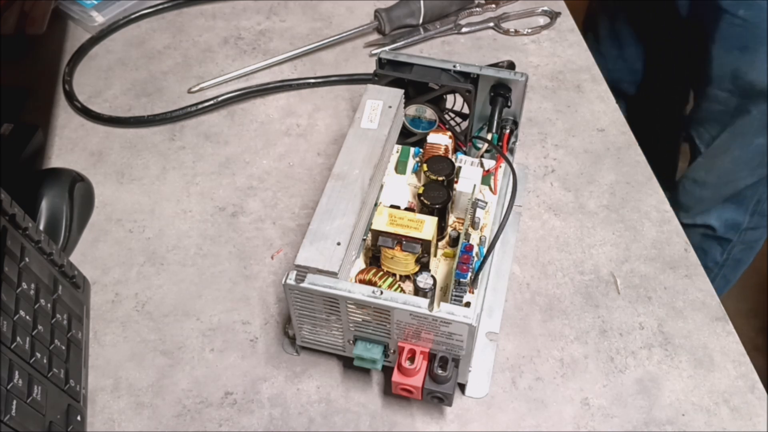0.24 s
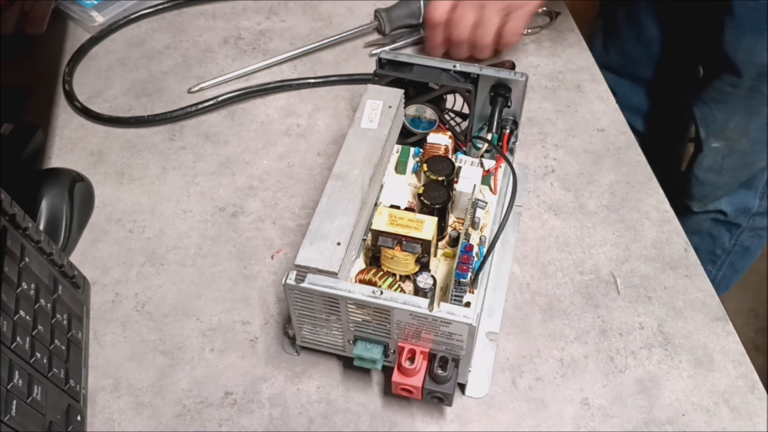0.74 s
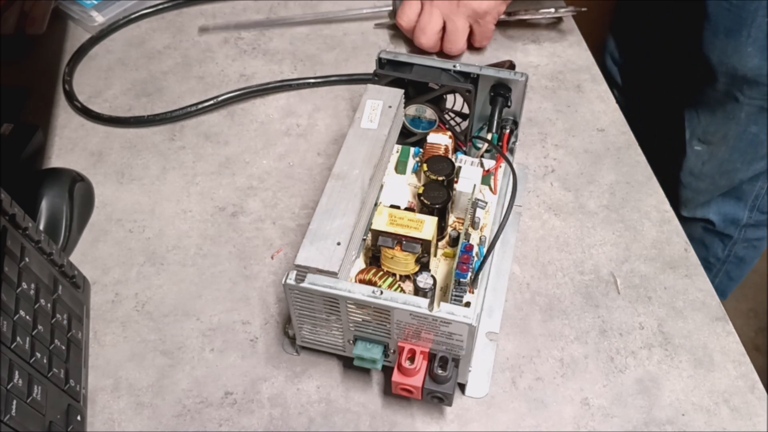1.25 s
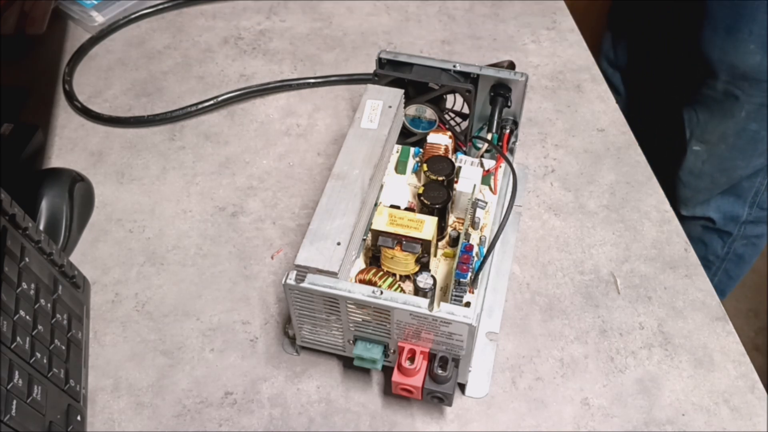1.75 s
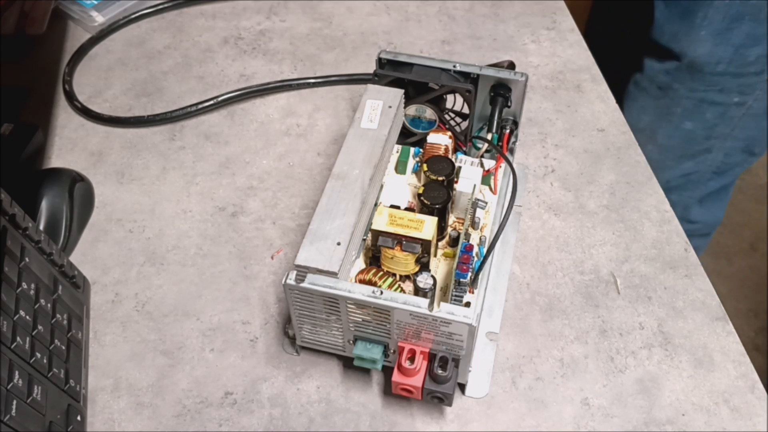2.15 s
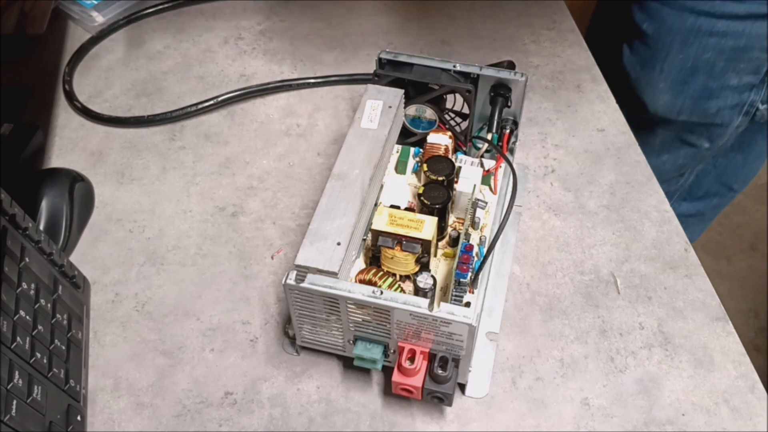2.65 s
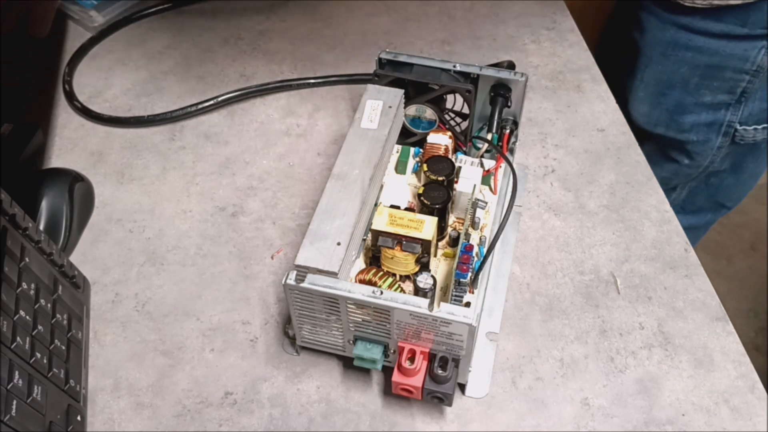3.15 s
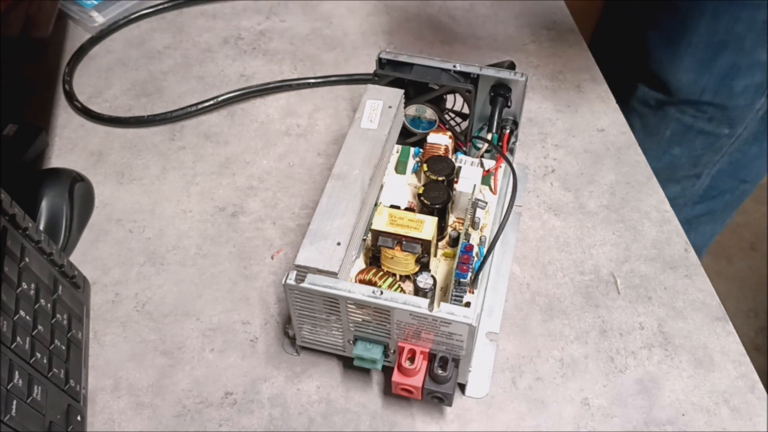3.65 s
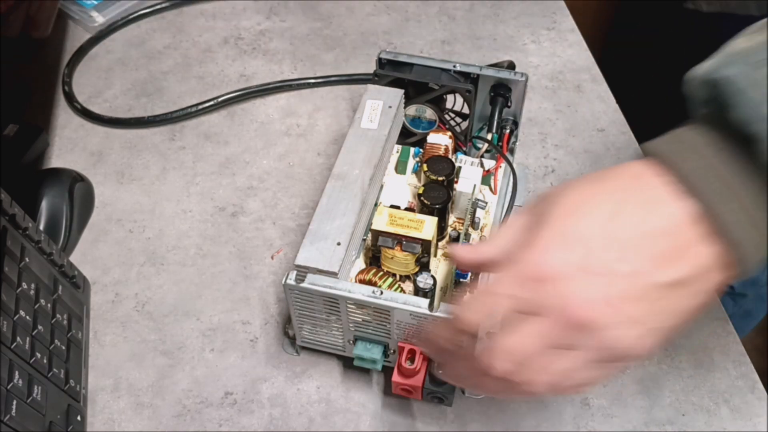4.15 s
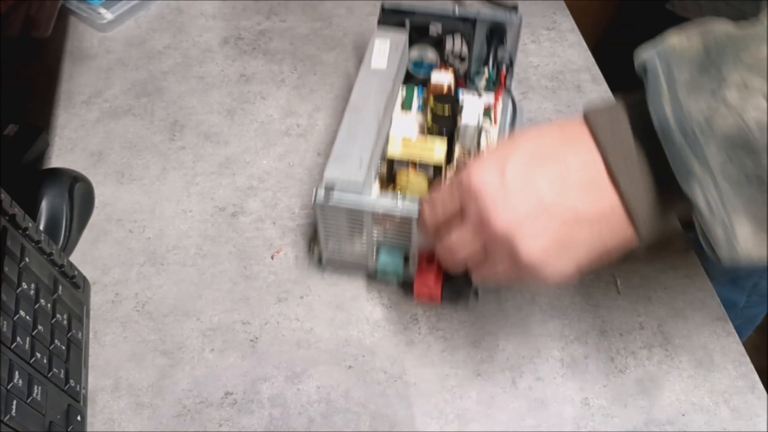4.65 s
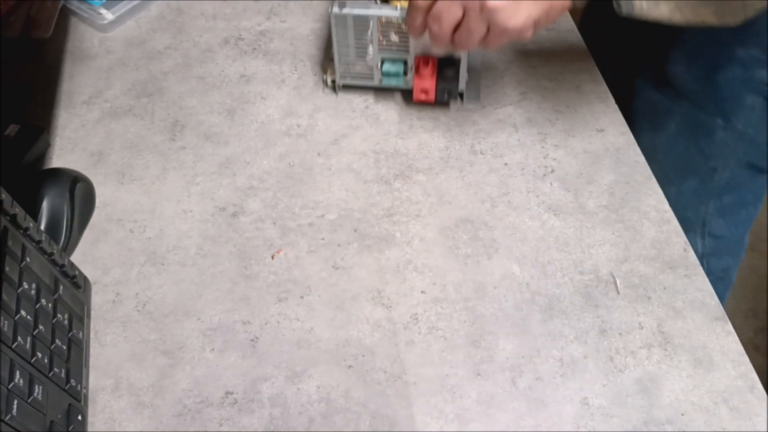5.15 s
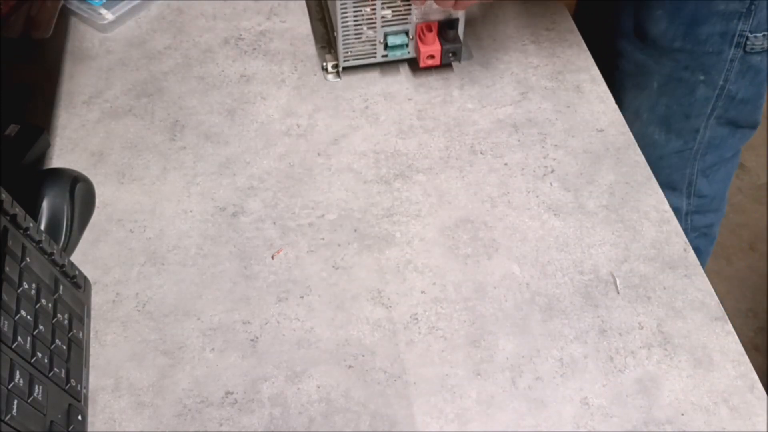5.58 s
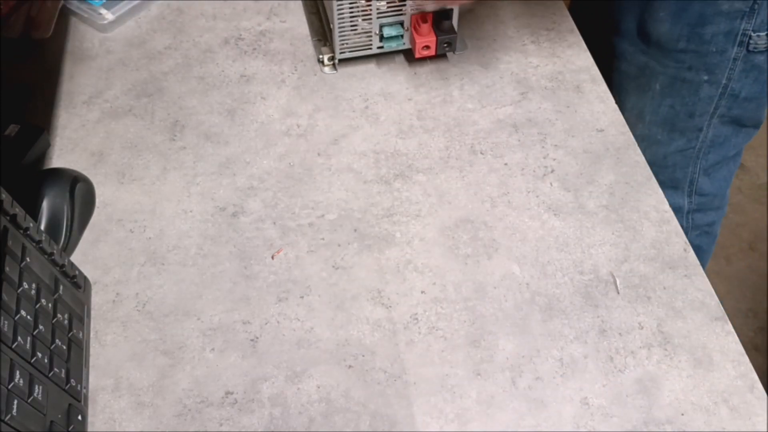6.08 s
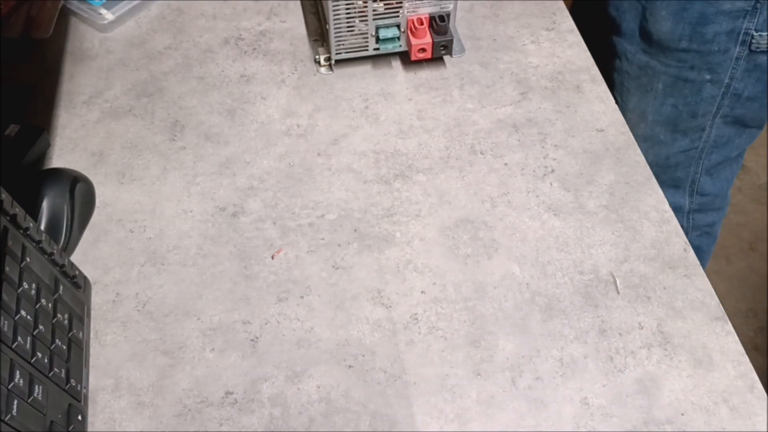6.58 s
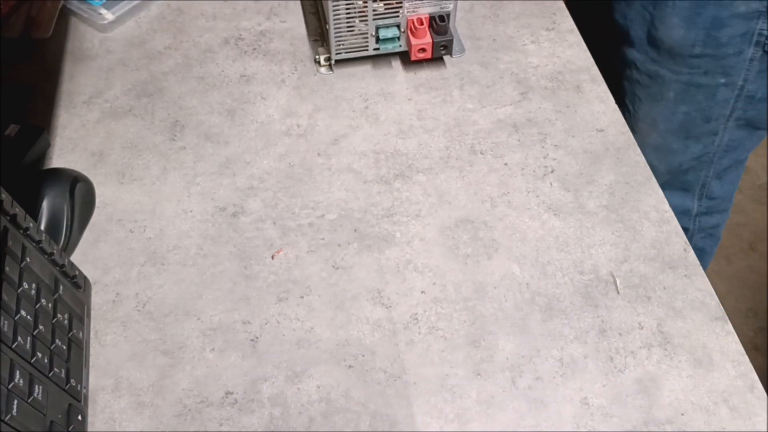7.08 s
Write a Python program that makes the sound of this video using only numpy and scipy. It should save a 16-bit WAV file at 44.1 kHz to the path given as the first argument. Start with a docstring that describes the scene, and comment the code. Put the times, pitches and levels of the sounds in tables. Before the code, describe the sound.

Steel hand tools are gathered off a countertop with jingles, then clatter down onto a shelf; a sheet-metal case scrapes briefly across the counter.

```python
"""A quiet room's hush and faint rustle come first; then steel hand tools are gathered off a countertop,
jingle in the hand and are dropped on a shelf. A sheet-metal case scrapes across the counter; small parts tick.
Blows are contact noise and damped modes, knocks a sine boom and a clack, rubbing shaped trains of tiny catches.
Two unlike microphone ports hear it: a bright right one and a duller left one a millisecond later."""
import sys
import numpy as np
from scipy import signal
from scipy.fft import rfft, irfft, next_fast_len
from scipy.io import wavfile
from scipy.ndimage import uniform_filter1d

SR = 44100
rng = np.random.default_rng(int(sys.argv[2]) if len(sys.argv) > 2 else 0)


def wav_out(sig):
    """Save sig, one row per channel (or a flat mono array), as 16-bit PCM at SR to the path in sys.argv[1]."""
    wavfile.write(sys.argv[1], SR, np.round(np.clip(np.atleast_2d(sig).T, -1, 1) * 32767).astype(np.int16))


def voltage_ratio(decibels):
    """Convert decibels (scalar or array-like) to amplitude ratios, 20 dB per decade."""
    exponent = np.asarray(decibels, float) / 20
    return 10 ** exponent


N = 322900
# Centres of the short-time analysis bins and frames
FRAME_HZ = np.fft.rfftfreq(1024, 1 / SR)
FRAME_S = np.arange(N // 256 + 2) * 256 / SR

# All levels are relative; spectra give only a shape.
# Room hush spectrum: (pitch_hz [Hz], level_db [dB])
AIR_SPECTRUM = [(15, -51), (25, -10.5), (80, -8), (117, -2.5), (134, -15.5), (162, -9.5), (196, -20),
                (287, -16), (338, -19.5), (581, -20.5), (630, -26), (782, -24.5), (4940, -38), (10000, -37),
                (16300, -46)]
# Reverberation of the room: (pitch_hz [Hz], t60_s [s])
ROOM_DECAY = [(100, 0.04), (500, 0.25), (2000, 0.31), (6000, 0.28), (12000, 0.2)]
# Left-right likeness: (pitch_hz [Hz], likeness [0-1])
LIKENESS = [(100, .95), (500, .8), (900, .35), (2000, .15), (8000, .1)]
# Left port's response over the right one's: (pitch_hz [Hz], level_db [dB])
PORT_DIFFERENCE = [(60, 4), (300, 6), (1300, 5.5), (3000, 1), (7500, -5), (9000, -14), (11000, -33),
                   (15000, -36)]
# Sleeves and hands brushing: (top_s [s], fade_s [s], skin_db [dB], cloth_over_skin_db [dB])
BRUSH_STROKES = [(0.27, 0.2, -78.5, 3.5), (0.41, 0.039, -75, 3), (2.145, 0.035, -64.5, 7.5),
                 (2.222, 0.097, -40, -12.5), (3.69, 0.18, -75.5, -83), (3.762, 0.089, -49.5, 3),
                 (4.027, 0.036, -45, -6.5), (4.12, 0.13, -63.5, 3.5), (5.8, 0.081, -58.5, -34),
                 (6.092, 0.11, -66, -2), (6.3, .15, -76.5, 1.5), (6.679, .15, -80, -4),
                 (6.951, 0.14, -61.5, -20.5), (7.128, 0.028, -58.5, -16), (7.218, 0.068, -54.5, -18),
                 (7.32, 0.04, -44.5, 12)]
# Spectrum of cloth hiss: (pitch_hz [Hz], level_db [dB])
CLOTH_SPECTRUM = [(880, -10), (1500, -1.5), (1780, -3.5), (8320, -13), (9560, -6.5), (12900, -19.5),
                  (14600, -27), (16000, -43)]
# Spectrum of skin rustle: (pitch_hz [Hz], level_db [dB])
SKIN_SPECTRUM = [(120, -40), (200, -8), (232, -62), (379, 9), (538, 13.5), (727, -9), (1770, -4),
                 (4000, -21), (5200, -26), (8800, -120)]
# Weight shifting on counter and floor: (top_s [s], fade_s [s], level_db [dB])
WEIGHT_THUMPS = [(0.37, 0.13, -64), (0.51, 0.18, -54.5), (0.7, 0.044, -45.5), (0.9, 0.22, -49.5),
                 (1.1, 0.22, -50), (1.45, 0.13, -71), (2.202, 0.12, -37.5), (2.359, 0.042, -53),
                 (2.84, 0.17, -61.5), (3.205, .12, -25), (3.42, 0.15, -30.5), (3.55, .1, -40),
                 (3.74, 0.079, -54.5), (4.032, 0.11, -50.5), (5.801, .1, -59), (6.05, .08, -62),
                 (6.92, 0.11, -69.5), (7.128, 0.049, -57), (7.218, .05, -60), (7.32, 0.097, -47.5)]
# Spectrum of the thumps: (pitch_hz [Hz], level_db [dB])
THUMP_SPECTRUM = [(15, -47.5), (25, -44.5), (118, 9.5), (151, -4), (209, -5), (249, -7), (382, -13.5),
                  (400, -9.5), (520, -46), (880, -120)]
# Tools dragged over the board: (top_s [s], fade_s [s], rattle_db [dB], hiss_over_rattle_db [dB])
TOOL_DRAGS = [(0.51, 0.11, -52.5, -10.5), (0.653, .07, -38.5, 2.5), (0.761, 0.093, -43, -24),
              (0.802, 0.034, -22.5, -14.5), (0.889, 0.12, -33.5, -24), (0.96, 0.15, -49, 3),
              (1.094, 0.081, -28.5, -12), (1.182, 0.046, -34, -7.5), (1.248, 0.049, -36.5, -1),
              (1.36, 0.1, -61.5, -25), (2.41, 0.21, -77.5, 20), (2.545, 0.11, -78.5, 27.5),
              (2.68, .15, -84, 16), (2.952, 0.091, -45.5, -0.5), (3.06, .07, -37, 6.5),
              (3.202, 0.054, -24, -3.5), (3.29, 0.2, -30.5, -6), (3.398, .1, -33.5, -2.5),
              (3.562, 0.11, -40.5, -5.5)]
# Spectrum of dragged steel: (pitch_hz [Hz], level_db [dB])
HISS_SPECTRUM = [(880, -57.5), (1500, 1.5), (2690, -7), (3000, -0.5), (3810, -15.5), (4160, -10),
                 (7840, -14.5), (10500, -23), (16000, -35)]
# Spectrum of the rattling board: (pitch_hz [Hz], level_db [dB])
RATTLE_SPECTRUM = [(120, -34.5), (200, -10.5), (518, -3), (573, -9.5), (794, -10), (856, -22), (1010, -6),
                   (4000, -28), (5200, -40.5), (8800, -120)]
# The case sliding: (time_s [s], level_db [dB], speed [0-1, raises the grit])
SLIDE_MOTION = [(4.175, -66, 0.5), (4.19, -51.5, 0.6), (4.294, -46, 0.4), (4.418, -35.5, 0.28),
                (4.5, -34, 0.32), (4.58, -36.5, 0.5), (4.65, -38, 0.58), (4.665, -33.5, 0.5),
                (4.75, -36.5, 0.69), (4.864, -34.5, 0.71), (4.92, -32.5, 0.48), (4.95, -34.5, 0.4),
                (5.038, -36, 0.39), (5.128, -42.5, 0.47), (5.202, -45.5, 0.33), (5.278, -51.5, 0.41),
                (5.33, -46.5, 0.86), (5.436, -39.5, 0.37), (5.635, -59, 0.33), (5.702, -61, 0),
                (5.722, -41.5, 0.64), (5.75, -70, 1), (5.8, -58, 0.5)]
# Panel resonances of the sliding case: (pitch_hz [Hz], width_hz [Hz, at least pitch / 40], level_db [dB])
CASE_PANELS = [(870, 150, -3), (1250, 130, 0), (2120, 80, -6), (2570, 200, -4), (3070, 150, -8),
               (3790, 120, -9), (4580, 140, -10), (7390, 200, -11), (9330, 250, -10), (10100, 450, -3),
               (11600, 300, -13)]
# Spectrum of the scrape: (pitch_hz [Hz], level_db [dB])
SCRAPE_SPECTRUM = [(150, -48), (250, -8), (798, 3.5), (1140, 0), (1300, 9), (1560, -4), (2570, -9),
                   (4000, -13), (5200, -10), (8800, -120)]
# Spectrum of the grit: (pitch_hz [Hz], level_db [dB])
GRIT_SPECTRUM = [(1180, -34), (2000, -5.5), (2600, -4), (3460, -6.5), (7570, -10), (9920, -7),
                 (13300, -14.5), (16000, -26.5)]
# Counter shuddering under a dropped or sliding weight: (top_s [s], fade_s [s], level_db [dB])
COUNTER_SHUDDERS = [(2.19, 0.078, -41), (3.02, 0.062, -46), (3.205, .08, -41.5), (3.5, 0.12, -54.5),
                    (4.26, 0.17, -58), (4.69, 0.12, -46), (4.83, 0.17, -48.5), (4.93, .08, -42),
                    (5.1, 0.075, -53.5), (5.27, 0.027, -57), (5.72, 0.082, -61.5)]
# Spectrum of the shudder: (pitch_hz [Hz], level_db [dB])
RUMBLE_SPECTRUM = [(15, -51.5), (25, 4.5), (59, 23.5), (129, 14.5), (182, 21), (300, -48), (390, -67),
                   (660, -120)]
# Board knocks, and the mid-pitched body of small ticks:
# (start_s [s], boom_db [dB], clack_over_boom_db [dB], boom_hz [Hz], clack_hz [Hz])
KNOCK_BLOWS = [(0.458, -60, 22, 116, 441), (0.503, -40.5, 8, 203, 756), (0.544, -31.5, 17.5, 164, 1240),
               (0.628, -40, 17.5, 180, 1470), (0.78, -27, 11.5, 172.6, 1760), (0.819, -35, 15.5, 178, 450),
               (0.885, -28.5, 11.5, 187, 1460), (1.015, -30.5, 19, 199, 1600), (1.049, -28, 11, 176, 1530),
               (1.072, -35.5, 9.5, 180, 525), (1.119, -45, 2, 188, 996), (1.226, -35, 15.5, 170, 1020),
               (1.775, -70, 29.5, 170, 1500), (1.845, -67.5, 32, 94.2, 1840),
               (1.973, -64.5, 24.5, 161, 689), (2.168, -33.5, 9, 166, 880), (2.205, -28.5, -0.5, 155, 540),
               (2.19, -23, 3, 153, 560), (2.717, -50, -2.5, 256, 1790), (2.902, -36.5, -12, 122, 1100),
               (2.994, -31, 23.5, 253, 1000), (3.032, -15.5, 1, 178, 1200), (3.068, -29.5, -3, 194, 1690),
               (3.123, -34, 14, 124, 869), (3.183, -20, 12.5, 134, 780), (3.207, -20.5, -8.5, 90, 721),
               (3.32, -25.5, 15.5, 117, 665), (3.382, -27, 13, 142, 525), (3.421, -37, -5.5, 135, 1640),
               (3.479, -26.5, 5, 203, 509), (3.716, -39.5, 10, 255, 527), (4.016, -46.5, 12, 140, 554),
               (4.181, -59, 27, 94.2, 565), (4.325, -59, 30, 133, 890), (5.707, -52, 9.5, 93, 816),
               (5.775, -61.5, 16.5, 80.7, 1410), (5.995, -61, 18.5, 94.2, 1330), (6.93, -67, 16, 120, 900),
               (7.117, -51, -13.5, 167, 611), (7.211, -54.5, 12.5, 80.7, 529),
               (7.294, -50, 13.5, 88.8, 945)]

# Blows; body_db is how much each wakes the range under 4.5 kHz.
# Tool shafts struck: (start_s [s], peak_db [dB], body_db [dB], contact_s [s])
SHAFT_BLOWS = [(0.7824, -2, -19.5, 0.0045), (0.793, -9.5, -19, 0.004), (0.829, -2, -39, 0.0043),
               (0.891, -3.5, -41, 0.00094)]
# Shears clinking: (start_s [s], peak_db [dB], body_db [dB], contact_s [s])
SHEAR_BLOWS = [(1.2035, -10, -23, 0.004), (1.2141, -12.5, -9, 0.0053), (1.2235, -11, -10, 0.0049),
               (1.2574, -18, -25, 0.0023), (2.37, -15.5, -40, 0.0044), (2.386, -9.5, -25.5, 0.0079),
               (2.4633, -28.5, -12, 0.0096), (2.4825, -6, -20, 0.0033), (2.5094, -22, -3.5, 0.0045),
               (2.5765, -13.5, -16, 0.0032), (2.587, -8, -13, 0.0023), (2.6738, -18.5, -22, 0.0027),
               (2.7217, -20, -13.5, 0.0055), (2.7487, -1, -23, 0.0029), (2.7736, -7.5, -13.5, 0.0033),
               (2.801, -16.5, -19, 0.019), (2.8614, -18.5, -17, 0.0048), (2.9482, -26.5, -11.5, 0.0016),
               (2.9756, -17, -17.5, 0.0018), (2.9976, -11.5, 9, 0.002), (3.0345, -9, -14, 0.0054),
               (3.0719, -8.5, -11.5, 0.0043), (3.1243, -8.5, -20, 0.00099), (3.1864, -13, -21, 0.012),
               (3.2091, -7, -28.5, 0.0092), (3.2455, -8.5, -15.5, 0.0051), (3.2924, -16.5, -19, 0.011),
               (3.3303, 3.5, -30.5, 0.0015), (3.3415, -4.5, -22, 0.0008), (3.3644, -16, -18.5, 0.017),
               (3.4161, -4.5, -9, 0.0035), (3.5339, -21.5, -4, 0.0024)]
# Small parts ticking: (start_s [s], peak_db [dB], body_db [dB], contact_s [s])
PART_TICKS = [(0.4946, -26.5, -21, 0.015), (0.6344, -30, 51, 0.0038), (0.69, -33.5, -9.5, 0.0022),
              (1.0166, -18, -3.5, 0.0024), (1.0495, -26, -7, 0.004), (1.6714, -9, -7.5, 0.0033),
              (1.7816, -11, -5, 0.0018), (1.8008, -23, 7, 0.0067), (1.8501, -13.5, -6, 0.0043),
              (1.9753, -22.5, -12, 0.0028), (6.9257, -34, 10, 0.0012)]
# The case tapped: (start_s [s], peak_db [dB], body_db [dB], contact_s [s])
CASE_BLOWS = [(4.1872, -20, 15, 0.00059), (4.2318, -32, -30, 0.0056), (4.3267, -27.5, -40, 0.0093),
              (4.3735, -18, -7, 0.0026), (4.4095, -15, -12, 0.0023), (4.4867, -15.5, -21, 0.0027),
              (4.656, -23.5, -6, 0.0028), (4.916, -25, -3, 0.003), (5.3254, -32, 17, 0.0043),
              (5.5094, -32.5, 25, 0.002), (5.7191, -21.5, -8.5, 0.00075), (5.996, -31, -2, 0.0016),
              (7.2184, -52.5, -10, 0.0039), (7.2958, -36.5, 15, 0.0024)]

# Modes; undamped_t60_s is capped at 0.15 s, then scaled by a damping factor.
# Board: (pitch_hz [Hz], level_db [dB], undamped_t60_s [s])
BOARD_MODES = [(382, -4, .1), (468, -4, .1), (545, -3, .1), (640, -3, .09), (718, 0, .1), (960, 0, .09),
               (1085, -3, .08), (1400, -3, .07), (1530, -2, .07), (1750, -2, .06), (2010, -4, .05),
               (2300, -5, .05)]
# Tool shafts: (pitch_hz [Hz], level_db [dB], undamped_t60_s [s])
SHAFT_MODES = [(4280, -11, .09), (4560, -12, .08), (4850, -15, .07), (5170, -13, .07), (6605, -13, .1),
               (6826, -10, .1), (7671, -12, .08), (8565, -8, .11), (9243, 0, .09), (10060, -20, .1),
               (11210, -20, .1), (12300, -24, .1), (13085, -24, .1), (14480, -21, .06)]
# Shears: (pitch_hz [Hz], level_db [dB], undamped_t60_s [s])
SHEAR_MODES = [(1766, -22, .15), (2606, -22, .15), (4958, -8, .08), (6648, -8, .12), (7101, -15, .1),
               (8667, -15, .12), (9286, -5, .15), (9410, -2, .12), (9730, -8, .1), (9990, -6, .12),
               (10130, -10, .1), (11270, 0, .15), (11650, -12, .08), (12220, -10, .12), (13720, -20, .1),
               (14490, -17, .08)]
# Small parts: (pitch_hz [Hz], level_db [dB], undamped_t60_s [s])
PART_MODES = [(2210, -22.5, 0.21), (3670, -19, 0.28), (4340, -16, 0.56), (5900, -9.5, 0.24),
              (6500, -2, 0.48), (8091, -15.5, 0.64), (8200, 0, 0.46), (8500, -14.5, 0.16),
              (9500, -26.5, 0.097), (9900, -8, 0.18), (10500, 10.5, 0.19), (10190, -37, 5.0),
              (10400, -22, 0.26), (11540, 13.5, 0.17), (12700, 1, 0.26), (12500, -7.5, 0.083)]
# The struck case: (pitch_hz [Hz], level_db [dB], undamped_t60_s [s])
LID_MODES = [(520, -4, .15), (1010, -8, .12), (1340, -3, .15), (2130, -10, .1), (2500, -7, .12),
             (3440, -3, .15), (4320, -10, .1), (5000, -10, .1), (5990, -5, .1), (7400, -8, .1),
             (8900, -4, .1), (9700, -5, .08), (10500, -9, .08), (11600, -8, .08)]

STEEL_SPLIT, SHEET_SPLIT = .003, .014  # relative detuning of beating modes
STROKE_RISE, LANDING_RISE = .45, .35  # swell against fade time: weight lands faster than a stroke swells


def evened(x):
    """Normalization: scales a signal to rms 1."""
    return x / np.sqrt(np.mean(x ** 2) + 1e-20)


def peaked(x):
    """Normalization: scales a signal to peak 1."""
    return x / abs(x).max()


def read(points, hz):
    """Interpolation: reads a table on a log-frequency axis."""
    f, value = np.transpose(points)
    return np.interp(np.log(hz + 1), np.log(f + 1), value)


def add(mix, s, sound):
    """Superposition: adds a sound, in place, from a time in seconds."""
    part = mix[round(s * SR):][:len(sound)]
    part += sound[:len(part)]


def shaped(x, gain):
    """Linear filtering: multiplies the spectrum by a gain given as a function of Hz."""
    size = next_fast_len(x.shape[-1], True)
    hz = np.fft.rfftfreq(size, 1 / SR)
    return irfft(rfft(x, size) * gain(hz), size)[..., :x.shape[-1]]


def pair(a, b):
    """Coherence: two channels share the bass and part ways in the treble."""
    same = lambda hz: np.clip(read(LIKENESS, hz), 0, 1)
    own = lambda hz: np.sqrt(1 - same(hz) ** 2)
    return np.array([shaped(a, same) + shaped(b, own), a])


def air():
    """Stationary noise: the steady hush of the room."""
    noise = pair(*rng.standard_normal((2, N)))
    return voltage_ratio(-67.5) * evened(shaped(noise, lambda hz: voltage_ratio(read(AIR_SPECTRUM, hz))))


def room(x, direct_db):
    """Reverberation: direct sound, then sparse reflections that die by band; two sets take turns."""
    reflected = 0
    slots = np.arange(60, SR // 4 - 20, 20)  # one reflection in every 20 samples
    turn = 2 * np.pi * 1.7 * np.arange(N) / SR  # 1.7 Hz, so the echo's colour keeps changing
    for weight in np.cos(turn), np.sin(turn):
        taps = np.zeros((2, SR // 4))
        places = slots + rng.integers(0, 20, (2, len(slots)))
        signs = rng.choice([-1., 1.], (2, len(slots)))
        np.put_along_axis(taps, places, signs, 1)
        hz, t, z = signal.stft(pair(*taps), SR, nperseg=256)
        decay = voltage_ratio(-60 * t / read(ROOM_DECAY, hz)[:, None])
        tail = signal.istft(z * decay, SR, nperseg=256)[1]
        tail = tail / np.linalg.norm(tail[1])
        reflected = reflected + signal.oaconvolve((x * weight)[None], tail, axes=1)[:, :N]
    return (reflected + voltage_ratio(direct_db) * x) / np.sqrt(1 + voltage_ratio(2 * direct_db))


def grainy(per_s, spread_db):
    """Friction as an impulse train: short-time spectra of two draws of tiny catches of uneven size."""
    at, sign, size = rng.random((3, N // 2))[:, :round(2 * per_s * N / SR)]
    catches = np.zeros(2 * N)
    size_db = spread_db * np.minimum(-np.log(1 - size), 4)
    catches[(at * 2 * N).astype(int)] = (sign - .5) * voltage_ratio(size_db)
    draws = evened(catches.reshape(2, N))
    return signal.stft(draws, nperseg=1024, noverlap=768)[2][:, :, :len(FRAME_S)]


def shifting(z, patch_db):
    """Moving contact: narrow parts of the spectrum swell and fade over about a tenth of a second."""
    patches = rng.standard_normal(z.shape[:0:-1]).T
    patches = uniform_filter1d(patches, size=5, axis=0)  # bins
    patches = evened(uniform_filter1d(patches, size=14, axis=1))  # frames
    moving = z * evened(voltage_ratio(patch_db * patches))
    return signal.istft(moving, nperseg=1024, noverlap=768)[1][:, :N]


def strokes(s, fade, db, rise=STROKE_RISE):
    """Summed power of strokes: each swells in a share, rise, of the time it takes to fade by 12 dB."""
    since = (FRAME_S[:, None] - s) / np.maximum(fade, .01)
    since = np.where(since < 0, since / rise, since)
    power = voltage_ratio(db - 12 * since ** 2) ** 2
    return np.sqrt(power.sum(1))


def played(gain, spectrum, peaks=(), lift=0):
    """Source and resonance: power over frequency and time of a resonant spectrum following a gain."""
    rung = sum(voltage_ratio(db) / (1 + (2 * (FRAME_HZ - hz) / max(width, hz / 40)) ** 2) for hz, width, db in peaks)
    colour = evened(voltage_ratio(read(spectrum, FRAME_HZ)) * (1 + lift * rung))
    return np.outer(colour, gain) ** 2


def rustle():
    """Soft friction and impact: cloth and skin brush gently; shifting weight thumps."""
    s, fade, skin_db, cloth_db = np.transpose(BRUSH_STROKES)
    cloth = played(strokes(s, fade, skin_db + cloth_db), CLOTH_SPECTRUM)
    skin = played(strokes(s, fade, skin_db), SKIN_SPECTRUM)
    thumps = played(strokes(*np.transpose(WEIGHT_THUMPS), LANDING_RISE), THUMP_SPECTRUM)
    return cloth + skin + thumps


def shuffle():
    """Friction-driven resonance: dragged steel hisses and sings a little, and the board rattles."""
    sing = [(hz, 150, db) for hz, db, t60 in SHEAR_MODES]  # 150 Hz wide
    s, fade, rattle_db, hiss_db = np.transpose(TOOL_DRAGS)
    hiss = played(strokes(s, fade, rattle_db + hiss_db), HISS_SPECTRUM, sing, 2.0)
    return hiss + played(strokes(s, fade, rattle_db), RATTLE_SPECTRUM)


def slide():
    """Stick and slip: metal feet catch on the counter and sound through the panels; speed adds grit."""
    s, db, speed = np.transpose(SLIDE_MOTION)
    rest_db, fast_db = -13, 13  # grit against the scrape at rest and at full speed
    grit_db = db + rest_db + (fast_db - rest_db) * speed
    scrape, grit = (voltage_ratio(np.interp(FRAME_S, s, v, left=-200, right=-200)) for v in (db, grit_db))
    shudder = strokes(*np.transpose(COUNTER_SHUDDERS), LANDING_RISE)
    scraping = played(scrape, SCRAPE_SPECTRUM, CASE_PANELS, 0.22)
    gritty = played(grit, GRIT_SPECTRUM, CASE_PANELS, 1.4)
    return scraping + gritty + played(shudder, RUMBLE_SPECTRUM)


def contact(length):
    """Contact time: the envelope of a chattering contact builds in a part of its length, then fades."""
    t = np.arange(SR // 10) / SR
    length = np.clip(length, .0004, .025)
    return (1 - np.exp(-t / (0.00016 + 0.61 * length))) * np.exp(-t / length)


def ring(modes, colour, spread_db, damping, split):
    """Modal vibration: close triplets of modes beat; each blow wakes them unevenly."""
    hz, db, t60 = np.transpose(modes + modes + modes)[:, :, None]
    t60 = np.clip(damping * np.minimum(t60, .15), .005, .2)
    t = np.arange(round(t60.max() * SR)) / SR
    strength, detune = rng.standard_normal((2, len(hz), 1))
    turns = hz * (1 + split * detune) * t
    level_db = db + read(colour, hz) + spread_db * strength - 60 * t / t60
    return (voltage_ratio(level_db) * np.sin(2 * np.pi * turns)).sum(0)


def struck(modes, colour, share, length, reach, damping, split):
    """Impact excitation: a crack of contact noise, and the same chatter ringing the struck part."""
    noise = rng.standard_normal(SR // 10)
    share = np.clip(share, 0, 1)  # ringing against crack
    milder = [(hz, reach * db) for hz, db in colour]
    ringing = signal.fftconvolve(contact(length) * noise, ring(modes, milder, 3, damping, split))
    crack = contact(length) * shaped(noise, lambda hz: voltage_ratio(read(colour, hz)))
    sound = share * peaked(ringing)
    add(sound, 0, (1 - share) * peaked(crack))
    return sound


def knocks():
    """Damped oscillation: a boom at one low pitch and a clack around a higher one, for board and small ticks."""
    out, t = np.zeros(N), np.arange(SR // 5) / SR
    for s, boom_db, clack_db, boom_hz, clack_hz in KNOCK_BLOWS:
        envelope = (1 - np.exp(-t / 0.0068)) * voltage_ratio(-60 * t / 0.076)  # t60 76 ms
        boom = envelope * np.sin(2 * np.pi * boom_hz * t)
        # keeps the boom around its own pitch, with little below
        boom = shaped(boom, lambda hz: 1 / (1 + (.7 * boom_hz / (hz + 1)) ** 4))
        colour = [(clack_hz / 6, -40), (clack_hz / 2.0, -5), (clack_hz, 0), (clack_hz * 1.9, -6),
                  (clack_hz * 6, -35)]
        clack = struck(BOARD_MODES, colour, share=0.5, length=0.0078, reach=1.0, damping=0.19, split=0.013)
        add(out, s, voltage_ratio(boom_db) * peaked(boom))
        add(out, s, voltage_ratio(boom_db + clack_db) * clack)
    return out


def clinks(rows, modes, damping, share, split=STEEL_SPLIT):
    """Hard impact: light blows of stiff parts, some bright near 10 kHz, others fuller below 4.5 kHz."""
    out = np.zeros(N)
    for s, peak_db, body_db, length in rows:
        middle_db = 0.66 * body_db  # the middle follows the body in part
        colour = [(250, body_db - 55), (800, body_db - 44.5), (1600, body_db - 9), (3500, body_db),
                  (6200, middle_db), (8000, middle_db - 1), (10000, 0.5), (12000, -5.0), (15500, -18.5)]
        add(out, s, voltage_ratio(peak_db) * struck(modes, colour, share, length, 0.16, damping, split))
    return out


def scene():
    """Superposition: blows sound through the room; rubbing reaches the two ports by different paths."""
    blows = clinks(SHAFT_BLOWS, SHAFT_MODES, damping=.6, share=.5)
    blows += clinks(SHEAR_BLOWS, SHEAR_MODES, damping=.7, share=.31)
    blows += clinks(PART_TICKS, PART_MODES, damping=.3, share=.16)
    blows += clinks(CASE_BLOWS, LID_MODES, damping=1.05, share=.3, split=SHEET_SPLIT)
    blows += knocks()
    # blows keep little below about 60 Hz; thumps and shudders carry the deep bass
    blows = shaped(blows, lambda hz: 1 / (1 + (62 / (hz + 1)) ** 6))
    rubbing = grainy(3500, 1.0) * np.sqrt(shuffle())
    rubbing = rubbing + grainy(6000, 0.99) * np.sqrt(rustle() + slide())
    return voltage_ratio(2.5) * room(blows, direct_db=1) + pair(*shifting(rubbing, patch_db=3.0)) + air()


def top_cut(x):
    """Nothing passes above the cut-off."""
    return signal.sosfilt(signal.butter(12, 16500, fs=SR, output="sos"), x)


def record(dry):
    """Arrival-time and response differences: unlike ports, the left one late; then the band limit."""
    lag = 48  # samples
    left = lambda hz: voltage_ratio(read(PORT_DIFFERENCE, hz))
    whole = lambda hz: 1.593 / np.sqrt(1 + left(hz) ** 2)  # keeps the summed power gain even
    late = np.concatenate([np.zeros(lag), dry[0, :-lag]])
    ports = np.array([shaped(late, lambda hz: left(hz) * whole(hz)), shaped(dry[1], whole)])
    ports += voltage_ratio(-104) * rng.standard_normal(ports.shape)  # hiss of the ports
    edge = signal.firwin(511, 15900, window=("kaiser", 9), fs=SR)  # low-pass, Hz
    limited = np.clip(signal.oaconvolve(ports, edge[None], "same"), -1, 1)
    return top_cut(limited)


dry = scene()
out = record(dry)
wav_out(out)
```